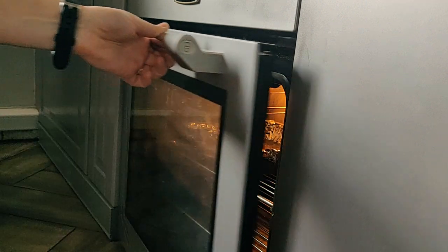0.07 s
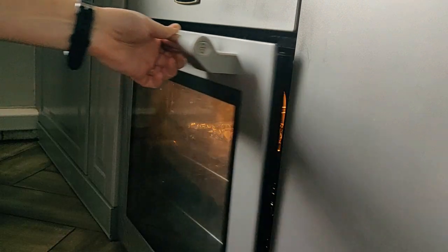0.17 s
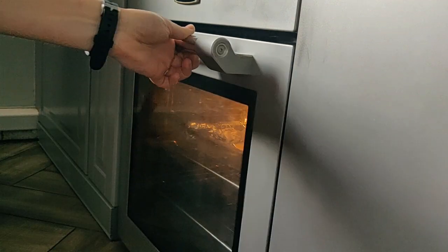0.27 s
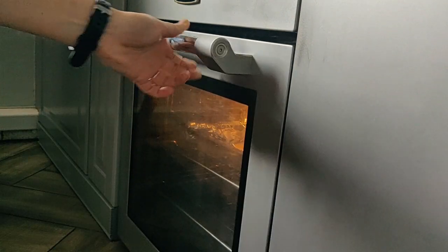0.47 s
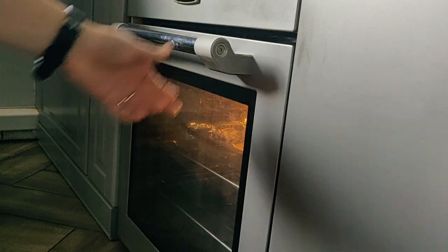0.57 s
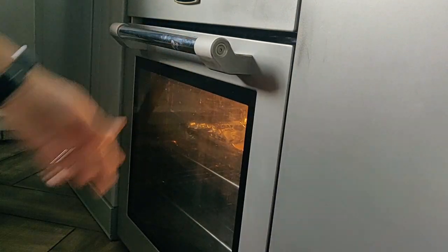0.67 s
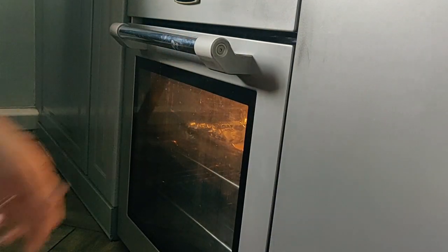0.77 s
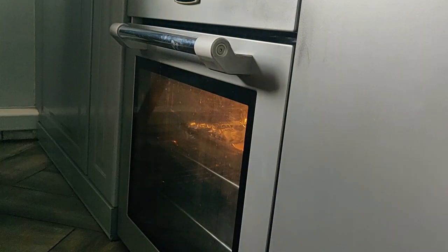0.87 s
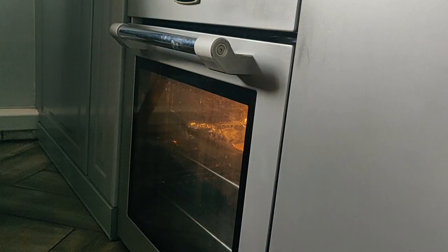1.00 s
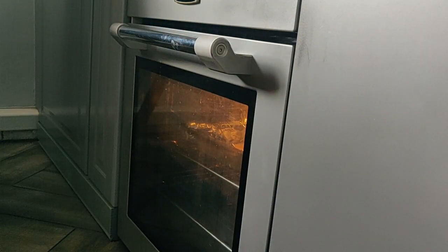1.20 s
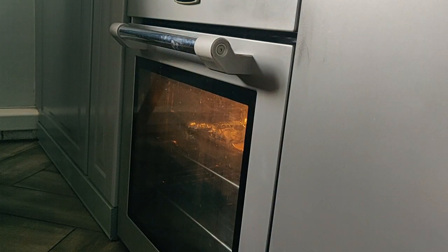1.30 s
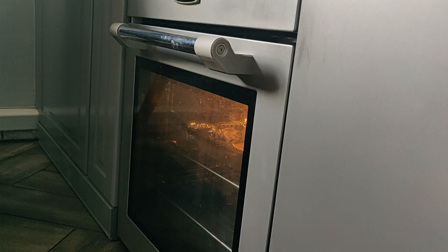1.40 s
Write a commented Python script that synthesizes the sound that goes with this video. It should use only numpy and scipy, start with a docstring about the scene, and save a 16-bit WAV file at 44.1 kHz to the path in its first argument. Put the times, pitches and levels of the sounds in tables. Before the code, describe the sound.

An oven door is pushed shut in a small kitchen. The fan's rush fades as the gap narrows, then the door hits with one clanking thud and rings briefly. The fan keeps humming behind it.

```python
"""A fan oven rushes and hums in a small kitchen while its door is pushed shut.
As the gap narrows the rush fades and a hollow low resonance rises in pitch. The door touches the catch,
then slams on the frame: a crack at the contact, a clank of sheet metal and glass, a thud of the cabinet
shoved through the seal, and a short room tail. The fan hums on behind the shut door."""
import sys
import numpy as np
from scipy import signal
from scipy.fft import rfft, irfft
from scipy.io import wavfile

SR = 44100
rng = np.random.default_rng(int(sys.argv[2]) if len(sys.argv) > 2 else 0)


def dump_mix(stems):
    """Bounce the given channels to the path in sys.argv[1] as a 16-bit WAV at rate SR."""
    frames = np.atleast_2d(stems).T  # one column per channel
    limited = np.clip(frames, -1, 1)  # hard clip at full scale
    pcm = np.round(limited * 32767).astype(np.int16)
    wavfile.write(sys.argv[1], SR, pcm)


N = 63945
TIME, BIN_HZ = np.arange(N) / SR, np.fft.rfftfreq(N, 1 / SR)
LEFT_RIGHT = np.array([[1], [-1]])


def from_db(db):
    """Decibels to gain."""
    return 10 ** (np.asarray(db) / 20)


def unit_rms(x):
    """Scale to rms 1."""
    return x / np.sqrt(np.mean(x ** 2) + 1e-20)


def automation(rows):
    """Each column of a breakpoint curve at every sample."""
    times, *columns = np.transpose(rows)
    return [np.interp(TIME, times, column) for column in columns]


def at_hz(points, hz):
    """Read a table on a log-frequency axis."""
    freqs, values = np.transpose(points)
    return np.interp(np.log(np.maximum(hz, 1)), np.log(freqs), values)


def decay(t60):
    """Envelope that falls 60 dB in t60 seconds."""
    return np.exp(-np.log(1000) * TIME / t60)


def drift(rate_hz):
    """Slow random wobble, rms 1."""
    return unit_rms(irfft(rfft(rng.standard_normal(N)) / (1 + (BIN_HZ / rate_hz) ** 2), N))


def pan(left_db):
    """Stereo gains with the left louder than the right by left_db."""
    return from_db(LEFT_RIGHT * left_db / 2)


def noise(spectrum, correlation, panning=((1, 0), (2, 0))):
    """Stereo noise of a given colour, width and pan; rms 1."""
    mid, side = rfft(rng.standard_normal((2, N)))
    alike = np.clip(at_hz(correlation, BIN_HZ), -1, 1)
    stereo = np.sqrt(1 + alike) * mid + np.sqrt(1 - alike) * side * LEFT_RIGHT
    return unit_rms(irfft(stereo * from_db(at_hz(spectrum, BIN_HZ)) * pan(at_hz(panning, BIN_HZ)), N))


def ringing(hz, db, t60, phase=0):
    """One struck mode: a decaying sine."""
    return from_db(db) * decay(t60) * np.sin(2 * np.pi * hz * TIME + phase)


def delayed(x, start_s):
    """Start a sound at start_s."""
    start = int(start_s * SR)
    return np.concatenate([np.zeros(x.shape[:-1] + (start,)), x[..., :N - start]], axis=-1)


# Colour of the fan bed behind the shut door: (frequency [Hz], relative density [dB])
FAN_SPECTRUM = [(15, -50), (25, -6.5), (52, -7.5), (73, -10), (119, 0.5), (184, -3), (228, -4), (247, -6.5),
                (307, -4), (333, -8.5), (391, -6.5), (424, -9.5), (526, -14.5), (570, -15.5), (670, -12.5),
                (767, -17), (977, -13), (1310, -23), (1550, -17), (2020, -21.5), (2720, -23.5),
                (3660, -33.5), (7380, -43), (10500, -51.5), (15700, -47)]
# Motor hum: (frequency [Hz], rms level [dB])
MOTOR_TONES = [(129.2, -57.5), (301.5, -50.5), (522.2, -59.5), (667.5, -71.5), (979.8, -63.5), (1545, -66),
               (2336, -69.5), (2719, -69.5)]
# Stereo width of the fan's air: (frequency [Hz], left-right correlation [clipped at 1])
FAN_CORRELATION = [(40, 0.5), (130, 1.05), (240, .92), (480, 0.27), (950, .5), (1900, 0.14), (3800, 0.05),
                   (7500, .5), (15000, 5.5)]
# Pan of the fan's air: (frequency [Hz], left over right [dB])
FAN_PAN = [(100, -0.32), (300, -1.9), (1000, 0.45), (8000, 0.92)]


def fan(air_db=-40, waver_db=1.7):
    """The bed: a steady rush of air and faintly wavering motor tones."""
    hum = 0
    for hz, db in MOTOR_TONES:
        peak = np.sqrt(2) * from_db(db + waver_db * drift(14))
        hum = hum + peak * np.sin(2 * np.pi * (hz * TIME + rng.random()))
    return from_db(air_db) * noise(FAN_SPECTRUM, FAN_CORRELATION, FAN_PAN) + hum


# Colour of the rush through the gap: (frequency [Hz], relative density [dB])
GAP_SPECTRUM = [(60, -47), (100, -5.5), (150, -3), (200, -4), (240, -13), (340, -10.5), (450, -17.5),
                (580, -19.5), (720, -12.5), (830, -14), (930, -11.5), (1100, -12), (1350, -23.5),
                (1600, -21), (2500, -31.5), (3600, -36), (4200, -42), (5200, -40.5), (9500, -55.5),
                (15000, -71)]
# Fade of that rush as the door closes: (time [s], level [dB])
GAP_FADE = [(0, -36.5), (.1, -33.5), (.24, -36), (.35, -38), (.45, -40), (.5, -45), (.53, -87)]
# Hollow resonance of the closing oven: (time [s], pitch [Hz], level [dB], octave level [dB])
HOLLOW_RISE = [(0, 105.4, -44.5, -43), (.1, 119.9, -37, -55), (.18, 123.2, -36, -59),
               (.215, 121.5, -30.5, -43), (.25, 127.2, -24, -64), (.29, 137, -30.5, -39),
               (.32, 138.3, -22.5, -42), (.37, 140.7, -33.5, -36.5), (.415, 140.9, -50, -37),
               (.455, 144.5, -30, -63), (.52, 145.8, -65, -67)]


def closing_gap(pitch_waver=0.0095, waver_db=0.03):
    """Fan noise escapes through the narrowing gap, with a hollow resonance that climbs."""
    rush_db, = automation(GAP_FADE)
    hz, level_db, octave_db = automation(HOLLOW_RISE)
    phase = 2 * np.pi * np.cumsum(hz * (1 + pitch_waver * drift(19))) / SR
    fundamental = from_db(level_db + waver_db * drift(28)) * np.sin(phase)
    octave = from_db(octave_db + waver_db * drift(30)) * np.sin(2 * phase)
    rush = from_db(rush_db) * noise(GAP_SPECTRUM, FAN_CORRELATION, FAN_PAN)
    return rush + np.sqrt(2) * (fundamental + octave)


# Colour of the room tail: (frequency [Hz], relative density [dB])
ROOM_SPECTRUM = [(47, -36), (80, -14), (107, -2.5), (177, -10.5), (231, -16.5), (269, -6.5), (321, -13),
                 (351, -19), (467, -18), (596, -18), (743, -17.5), (886, -11), (1180, -23), (1290, -12),
                 (1840, -15.5), (2440, -13.5), (3640, -18.5), (4240, -21), (4950, -30), (5410, -31),
                 (6900, -19), (9390, -31.5), (13400, -32.5), (14300, -17), (15600, -28.5)]
# Reverb time of the kitchen: (frequency [Hz], t60 [s])
ROOM_T60 = [(100, 0.52), (400, 0.53), (1500, 0.43), (3000, 0.51), (7000, 0.43), (15000, 0.33)]
# Stereo width of the tail: (frequency [Hz], left-right correlation [-1 to 1])
ROOM_CORRELATION = [(120, 0.98), (260, 0.92), (480, 0.75), (950, -0.23), (3800, -0.061), (7500, 0.68),
                    (15000, 0.81)]


def kitchen_tail(send_db=-17, attack_s=0.0047):
    """Diffuse answer of the room to one blow; each octave dies at its own pace."""
    spectrum = rfft(noise(ROOM_SPECTRUM, ROOM_CORRELATION))
    centres_hz = 62.5 * 2 ** np.arange(9)
    octave = np.log2(np.clip(BIN_HZ, centres_hz[0], centres_hz[-1]))
    tail = 0
    for hz in centres_hz:
        band = np.maximum(0, 1 - abs(octave - np.log2(hz)))
        tail = tail + irfft(spectrum * band, N) * decay(at_hz(ROOM_T60, hz))
    return from_db(send_db) * tail * (1 - np.exp(-TIME / attack_s))


# Low-end weight of the cabinet: (frequency [Hz], level before the push softens it [dB], t60 [s])
THUD_MODES = [(38.3, -30, 0.85), (70.5, -16.5, 0.16)]


def cabinet_thud(start_s=0.5165, push_s=0.0056):
    """The seal is squeezed, and its soft push rocks the whole cabinet."""
    push = np.hanning(int(push_s * SR))
    rocking = sum(ringing(hz, db, t60) for hz, db, t60 in THUD_MODES)
    thud = -signal.fftconvolve(rocking, push / push.sum())[:N]
    return pan(left_db=1) * delayed(thud, start_s)


# Snap of the contact point: (frequency [Hz], relative density [dB])
CRACK_SPECTRUM = [(200, -14), (900, -0.5), (2000, 0), (4000, -6.5), (6500, -7), (9000, -17), (13000, -18),
                  (15500, -8)]
# Dense clank of the door's panels: (frequency [Hz], relative density [dB])
PANEL_SPECTRUM = [(88, -46), (150, -10.5), (308, -4), (420, -31), (510, -21), (738, -3), (862, -22),
                  (932, 2.5), (1050, -10), (1130, -5.5), (1570, -6), (2150, -15.5), (2420, -4.5),
                  (2710, -6.5), (2930, -7.5), (3560, -13.5), (4000, -7), (4590, -10.5), (4860, -39),
                  (5900, -15.5), (9050, -27.5), (11700, -17.5), (12800, -25), (14200, -13), (15600, -41)]
# Clear ring of the door: (frequency [Hz], relative level [dB], t60 [s])
RING_MODES = [(127.6, -25.5, 0.31), (158, -31.5, 0.52), (183.3, -31.5, 0.74), (267.5, -19.5, 0.31),
              (534, -25.5, 0.27), (626, -43.5, 0.2), (798, -31.5, 0.25), (859, -22.5, 0.12),
              (906, -16, .15), (1481, -25.5, 0.37), (1676, -33, 0.35), (1868, -33.5, 0.22),
              (2368, -22, 0.36), (2639, -31.5, 0.38), (3346, -31, 0.48), (4082, -33, 0.41),
              (4300, -42, 0.2), (6810, -36, 0.55), (9265, -56, .22), (10600, -42, .27), (14090, -37, .2),
              (15140, -25, 0.27)]
# Stereo width of the door: (frequency [Hz], left-right correlation [0 to 1])
DOOR_CORRELATION = [(60, .97), (130, 1), (260, 0.97), (480, 0.067), (950, 0.73), (1900, 0.75), (3800, 0.43),
                    (15000, 0)]
# Pan of the door: (frequency [Hz], left over right [dB])
DOOR_PAN = [(250, -1.5), (450, 9), (740, 9.5), (1200, 8), (3300, -1.5), (5500, 10.5), (9000, -5.5),
            (15000, -3)]


def door_blow(hit_db, lowpass_hz, boom_db, crack_db, panel_db=-10, boom_below_hz=400):
    """One contact: a crack, ringing panels, a low boom and the room; a soft contact is duller."""
    crack = from_db(crack_db) * noise(CRACK_SPECTRUM, DOOR_CORRELATION, DOOR_PAN) * decay(t60=0.021)
    clank = from_db(panel_db) * noise(PANEL_SPECTRUM, DOOR_CORRELATION, DOOR_PAN) * decay(t60=0.088)
    boom = 0
    for hz, db, t60 in RING_MODES:
        # A phase offset between left and right gives each mode its width.
        offset = np.arccos(at_hz(DOOR_CORRELATION, hz)) * rng.choice([-1, 1])
        phase = LEFT_RIGHT * offset / 2
        gains = pan(at_hz(DOOR_PAN, hz))
        if hz < boom_below_hz:
            boom = boom + gains * ringing(hz, db + boom_db, t60, phase)
        else:
            clank = clank + gains * ringing(hz, db, t60, phase + rng.uniform(0, 2 * np.pi))
    lowpass = signal.butter(1, lowpass_hz, fs=SR, output="sos")
    hit = crack + signal.sosfilt(lowpass, clank + kitchen_tail())
    return from_db(hit_db) * hit + boom


# Hits of the door on catch and frame; the boom has its own fader, apart from the hit gain:
# (time [s], hit gain [dB], low-pass corner [Hz], boom gain [dB], crack gain within the hit [dB])
DOOR_HITS = [(.4990, -10, 2190, -2.5, -13.5), (0.5078, -9.5, 1515, -11, -18), (.5203, -2, 8000, -11.5, -11),
             (0.5246, 0.5, 13300, -7.5, -7.5), (.5315, -5, 1970, -2, -16)]


def door_slam():
    """The touch on the catch, the slam and its quick rebounds."""
    return sum(delayed(door_blow(*blow), start_s) for start_s, *blow in DOOR_HITS)


def scene():
    """The fan bed and the closing gap lead into the slam, with the cabinet's thud underneath."""
    return fan() + closing_gap() + door_slam() + cabinet_thud()


def record(dry, ceiling=0.85, cutoff_hz=15900):
    """Soft clipping rounds the peaks, then a steep low-pass trims the top."""
    lowpass = signal.ellip(10, 0.2, 90, cutoff_hz, fs=SR, output="sos")
    return signal.sosfilt(lowpass, ceiling * np.tanh(dry / ceiling))


dry = scene()
out = record(dry)
dump_mix(out)
```